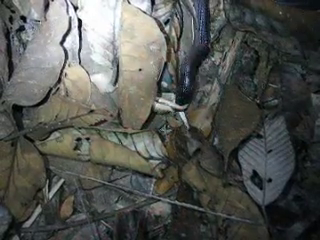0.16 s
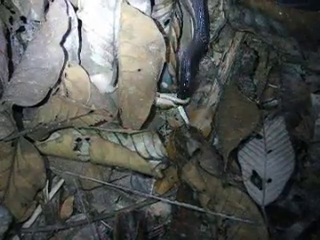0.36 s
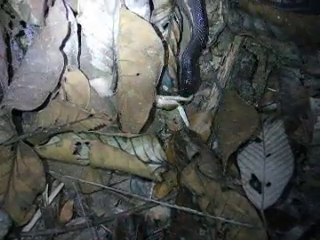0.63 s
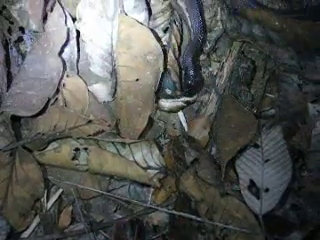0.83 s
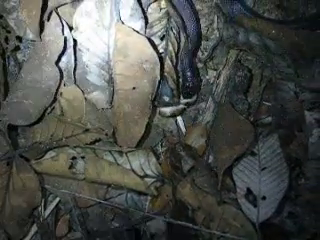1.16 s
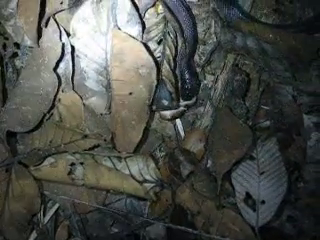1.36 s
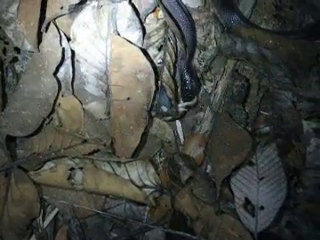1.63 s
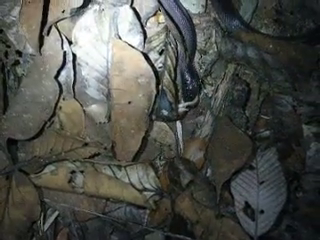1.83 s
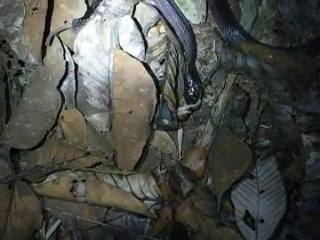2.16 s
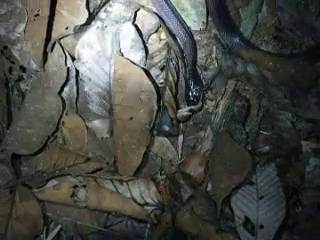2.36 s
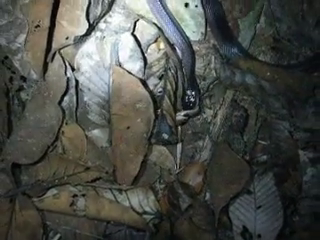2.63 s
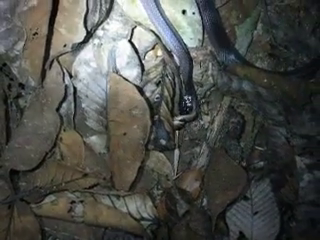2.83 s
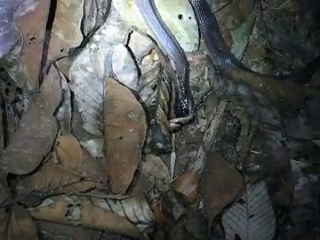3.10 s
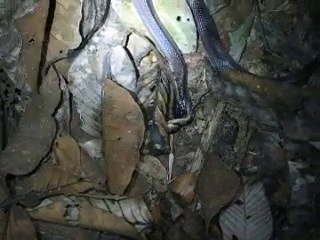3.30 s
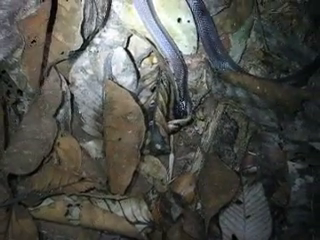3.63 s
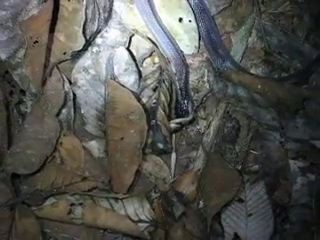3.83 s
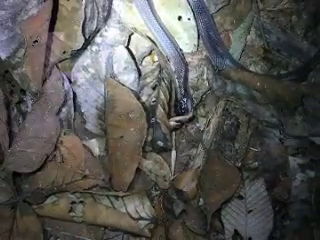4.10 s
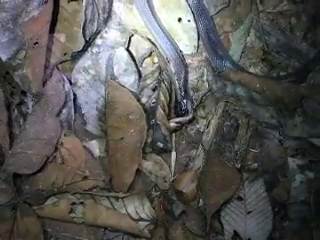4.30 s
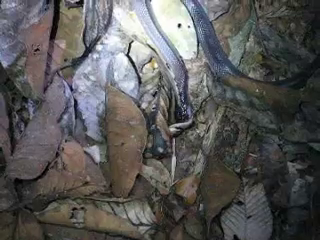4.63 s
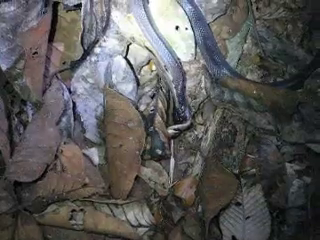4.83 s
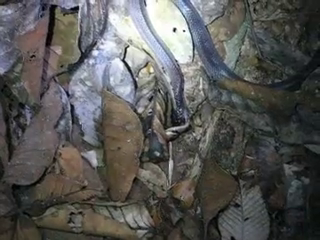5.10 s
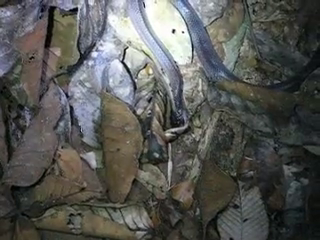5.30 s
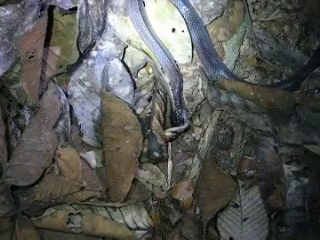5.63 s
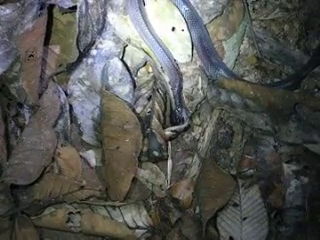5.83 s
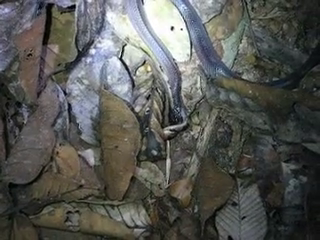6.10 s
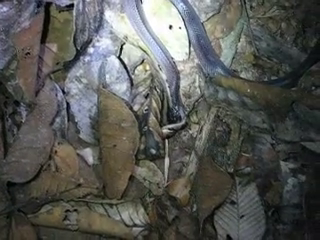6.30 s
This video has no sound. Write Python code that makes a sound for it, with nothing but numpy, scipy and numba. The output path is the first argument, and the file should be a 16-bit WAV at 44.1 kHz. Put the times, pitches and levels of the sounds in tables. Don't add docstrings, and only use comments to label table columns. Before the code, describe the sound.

Rainforest floor at night: a dense, high insect choir pulses rapidly while crickets trill in overlapping bouts at several lower pitches. Very close to the handheld stereo microphone, fingers and strap tick, snap and rustle on plastic for three seconds, then only rare taps remain. Faint hiss, thin electronic whine, motor hum and soft breeze flutter lie underneath; a faint very high katydid buzz enters near the end.

```python
import sys
import numpy as np
from scipy import signal
from scipy.fft import irfft, next_fast_len
from scipy.io import wavfile
from scipy.ndimage import uniform_filter1d
from numba import njit

SR = 44100
rng = np.random.default_rng(int(sys.argv[2]) if len(sys.argv) > 2 else 0)


def gain_from_decibels(decibels):
    exponent = np.asarray(decibels, float) / 20
    return 10 ** exponent


def dump(signal):
    limited = np.clip(np.atleast_2d(signal).T, -1, 1)
    pcm = np.round(limited * 32767).astype(np.int16)
    wavfile.write(sys.argv[1], SR, pcm)


N = 284743


@njit
def ring(x, hz, t60):
    y, z = np.empty(len(x)), 0j
    for i in range(len(x)):
        fade = np.exp(-np.log(1000) / (t60[i] * SR))
        z = z * fade * np.exp(2j * np.pi * hz[i] / SR) + x[i]
        y[i] = z.imag
    return y


def walk(rate):
    k = int(SR / rate)
    steps = np.repeat(rng.standard_normal(N // k + 1), k)
    return 1.3 * uniform_filter1d(uniform_filter1d(steps, k), k)[:N]


def curve(table):
    s, *columns = np.transpose(table)
    return [np.interp(np.arange(N) / SR, s, c) for c in columns]


def bumps(rest_db, s, length, db):
    since = np.arange(N) / SR - np.array(s)[:, None]
    away = np.where(since < 0, -since / 0.95, since)
    away = away / np.array(length)[:, None]
    return np.maximum(rest_db, np.max(np.array(db)[:, None] - 13.5 * away, axis=0))


def ears(db, pan_db):
    return gain_from_decibels(np.array([db + pan_db / 2, db - pan_db / 2]))


def shape(points):
    points_hz, points_db = np.transpose(points)
    return lambda hz: gain_from_decibels(np.interp(np.log(hz), np.log(points_hz), points_db))


def hump(centre_hz, width_hz):
    return lambda hz: np.exp(-.5 * ((hz - centre_hz) / width_hz) ** 2)


def noise(gain):
    # pitch_hz, correlation (0 to 1)
    likeness = [(60, 0.2), (300, 0.63), (1400, 0.58), (3000, 0.14), (15000, 0.037)]
    size = next_fast_len(N, True)
    hz = np.maximum(np.fft.rfftfreq(size, 1 / SR), 1)
    like_hz, like = np.transpose(likeness)
    alike = np.clip(np.interp(np.log(hz), np.log(like_hz), like), 0, 1)
    real, imaginary = rng.standard_normal((2, 2, len(hz)))
    mid, side = (real + 1j * imaginary) * np.sqrt([1 + alike, 1 - alike]) * gain(hz)
    x = irfft(np.array([mid + side, mid - side]), size)[:, :N]
    return x / np.sqrt(np.mean(x ** 2))


def hiss():
    # pitch_hz, level_db (per Hz)
    air = [(15, -62), (30, -18), (430, -7), (900, -8), (1270, -11.5), (2510, -12), (3000, -7.5),
           (5500, -51)]
    # pitch_hz, level_db (per Hz)
    amplifier = [(5000, -9), (6900, -11), (7500, 1.5), (8800, -1), (11500, -3.5), (14500, -6), (16000, -10)]
    return noise(shape(air)) * gain_from_decibels(-62.5) + noise(shape(amplifier)) * gain_from_decibels(-67.5)


def breeze():
    # peak_s, length_s, level_db
    puffs = [
        (0, .05, -67),
        (1.15, 0.99, -66),
        (2.64, 0.55, -67),
        (3.76, 0.63, -64.5),
        (4.7, 0.83, -68),
        (6.46, .3, -65.5),
    ]
    calm_db = -72
    return noise(hump(280, 134)) * gain_from_decibels(bumps(calm_db, *np.transpose(puffs)) - 3.0)


def camera():
    # pitch_hz, width_hz, level_db
    housing = [(453, 9.7, -77.5), (705.5, 17.4, -76.5), (967, 42, -69.5), (1590, 61, -74),
               (1934, 41, -83.5)]
    whine_hz, frames_per_s, width_hz = 8264.5, 30., 1000.0
    since_frame = np.arange(N) / SR % (1 / frames_per_s)
    whine = np.sqrt(2) * np.sin(2 * np.pi * whine_hz * since_frame)
    heard = []
    for hz, db in ((8350.0, -72.5), (8150.0, -57)):
        heard.append(signal.lfilter(*signal.iirpeak(hz, hz / width_hz, fs=SR), whine) * gain_from_decibels(db))
    motor = sum(noise(hump(hz, width)) * ears(db + walk(3.19), 1.2) for hz, width, db in housing)
    return np.array(heard) + motor


def far_insects():
    # pitch_hz, width_hz, level_db, pan_db (left minus right)
    far = [(3480, 310, -68.5, -7), (4084, 180, -59, 3), (4327, 44, -60.5, -6), (4856, 117, -60, 3),
           (5470, 210, -59, 9), (5796, 90, -56.5, -11), (5977, 100, -50.5, -0.5), (6035, 56, -59, 10.5),
           (6190, 100, -69, 5), (6368, 97, -61, 1.5), (6680, 140, -67, 3), (7200, 870, -88.5, 2)]
    # pitch_hz, width_hz, level_db (over the swell)
    joining = [
        (4546, 38, -2),
        (4663, 93, -6),
    ]
    steady = 0
    for hz, width, db, pan_db in far:
        level_db = db + 2.03 * walk(1.09) + 1.33 * walk(12)
        steady = steady + noise(hump(hz, width)) * ears(level_db, pan_db)
    crowd = sum(noise(hump(hz, width)) * gain_from_decibels(db + 0.76 * walk(23)) for hz, width, db in joining)
    swell_peak_s, swell_period_s = 1.93, 2.33
    swell = np.cos(2 * np.pi * (np.arange(N) / SR - swell_peak_s) / swell_period_s)
    return steady + crowd * gain_from_decibels(-55.5 + 2.5 * swell)


def chirper(hz, start_s, period_s, duty=0.73, wander_hz=8., flutter_db=2.5):
    phase = (np.arange(N) / SR - start_s) / period_s % 1
    gate = np.sin(np.pi * np.clip(phase / duty, 0, 1)) ** 0.55
    port_turns = np.array([0 * phase, 0.26 + 0.037 * walk(1.87)])
    turns = np.cumsum(hz + wander_hz * walk(20)) / SR + port_turns
    return 2 * np.sin(2 * np.pi * turns) * gate * gain_from_decibels(flutter_db * np.array([walk(70), walk(70)]))


def choir():
    # time_s, level_db
    leader = [(0.0, -60), (0.4, -53), (0.97, -46.5), (1.3, -53.5), (2.34, -44.5), (2.77, -43.5), (3.4, -48),
              (4.01, -52.5), (4.33, -62), (4.69, -50), (6.46, -52)]
    # time_s, level_db
    whole = [
        (0.0, -48),
        (0.36, -46.5),
        (1.46, -47.5),
        (2.32, -46.5),
        (3.18, -57),
        (4.37, -53),
        (4.71, -50),
        (6.3, -48.5),
    ]
    period_s = .06698
    near = chirper(5882, 2.193, period_s) * ears(curve(leader)[0], 6.5 + 5.1 * walk(2.6)) * gain_from_decibels(-2.0)
    count, crowd = 12, 0
    for hz, (start, pace, side) in zip(np.linspace(5830.0, 6120.0, count), rng.standard_normal((count, 3))):
        voice = chirper(hz, start, period_s * (1 + 0.031 * pace)) * hump(5950.0, 140.0)(hz)
        crowd = crowd + voice * ears(2.75 * walk(1.445), 2.4 * side + 0.91 * walk(1.23))
    return near + crowd * ears(curve(whole)[0], 5.5) * gain_from_decibels(-12.0)


def add_trills(out, wing, starts, length, left_db, right_db, tiring_db):
    hz, strokes, left_hz, right_hz, width_hz = wing
    t, fade_s = np.arange(N) / SR, .1
    rise_s = np.clip(0.31 * length, fade_s, .25)
    drift = 2 * np.pi * np.cumsum(2.5 * walk(4)) / SR
    phases = rng.random((5, 1))
    apart = np.array([0, .25])[:, None, None]
    lines = hz + strokes * np.arange(-2, 3)
    left = hump(left_hz, width_hz)(lines) * gain_from_decibels(left_db)
    right = hump(right_hz, width_hz)(lines) * gain_from_decibels(right_db)
    weights = np.array([left, right])
    for k, start in enumerate(starts):
        on = slice(max(int(start * SR), 0), min(int((start + length) * SR), N))
        edges = np.minimum((t[on] - start) / rise_s, (start + length - t[on]) / fade_s)
        swell = np.sin(np.pi / 2 * np.clip(edges, 0, 1)) ** 2
        angle = 2 * np.pi * (lines[:, None] * t[on] + phases + apart) + drift[on]
        tones = np.sqrt(2) * np.sin(angle)
        out[:, on] += np.einsum("ek,ekt->et", weights, tones) * swell * gain_from_decibels(-tiring_db * k)


def crickets():
    # pitch_hz, strokes_per_s, left_resonance_hz, right_resonance_hz, width_hz
    wings = [(4569.5, 120, 4580, 4490, 110), (4646, 119.5, 4660, 4600, 120), (4657, 119.5, 4650, 4620, 100),
             (3424, 118.5, 3480, 3410, 130), (4040, 102, 3990, 4090, 110), (4373, 119, 4410, 4400, 90),
             (3336, 118, 3336, 3336, 50), (5100, 118, 5100, 5100, 50), (6720, 28, 6720, 6720, 25),
             (6555, 28, 6555, 6555, 25), (12600, 45, 12600, 12600, 90), (1930, 28, 1930, 1930, 20)]
    # first_start_s, length_s, repeat_every_s
    bouts = [(1.18, .82, 1.95), (1.45, .66, 2.02), (.43, .62, 4.3), (-.3, 7, 9), (-.3, 7, 9),
             (1.75, .62, 2.12), (3.2, 1.1, 1.35), (1.2, 1.5, 3.2), (1.55, .21, 1.88), (2.55, .19, 1.93),
             (-.3, 1.25, 9), (3.3, .5, 2.58)]
    # left_db, right_db, tiring_db (lost with each repeat)
    bout_levels = [(-50, -51, 2), (-52, -51.5, 2.9), (-52.5, -53, 4), (-68, -69.5, 0), (-63.5, -65.5, 0),
                   (-59.5, -62, 0.5), (-69, -68, 6), (-72, -66, -4), (-65, -62, 0), (-63, -64, -2),
                   (-76, -86, 0), (-75, -72, 1)]
    # pitch_hz, first_call_s, last_call_before_s, left_db, right_db
    phrases = [
        (4160, 0.9, 1.5, -61, -57.5),
        (4066, 2.1, 2.45, -54, -55.5),
        (4400, 2.28, 2.9, -69, -62),
        (5310, 2.5, 4.5, -65, -64),
        (4210, 5.27, 5.65, -58, -54),
        (4220, 6.9, 7.3, -63, -61),
    ]
    out = np.zeros((2, N))
    for wing, (first, length, every), levels in zip(wings, bouts, bout_levels):
        add_trills(out, wing, np.arange(first, N / SR, every), length, *levels)
    call_s, call_every_s, strokes, width_hz = .25, .257, 28, 35
    for hz, first, last, left_db, right_db in phrases:
        wing = (hz, strokes, hz, hz, width_hz)
        add_trills(out, wing, np.arange(first, last, call_every_s), call_s, left_db, right_db, 0)
    return out * gain_from_decibels(1.1 * np.array([walk(9), walk(11)]))


def rustle():
    # time_s, level_db
    handling = [
        (0, -71),
        (1.9, -70),
        (2.9, -74),
        (3.3, -77),
        (6.46, -77.5),
    ]
    # peak_s, length_s, bright_db, dull_db
    drags = [(0.108, .08, -62, -53.5), (0.288, 0.15, -61.5, -55), (0.644, 0.034, -58.5, -56),
             (0.896, 0.036, -58, -42), (1.38, 0.038, -55.5, -42), (1.753, 0.019, -51.5, -42.5),
             (1.978, .07, -59.5, -51.5), (2.114, .05, -65, -62), (2.276, 0.12, -63.5, -55),
             (2.433, 0.037, -62.5, -60), (2.497, 0.032, -60, -54), (2.707, 0.025, -54.5, -58),
             (2.997, 0.037, -54.5, -54), (3.96, 0.25, -66.5, -59), (6.15, 0.54, -79, -63)]
    hands_db = curve(handling)[0]
    s, length, bright_peaks_db, dull_peaks_db = np.transpose(drags)
    bright_db = bumps(hands_db, s, length, bright_peaks_db)
    dull_rest_db = hands_db[0] + 10 + 4.2 * (hands_db - hands_db[0])
    dull_db = bumps(dull_rest_db, s, length, dull_peaks_db)
    grains_per_s, scatter_db = 900., 3.5
    sizes = gain_from_decibels(scatter_db * np.minimum(rng.exponential(size=N), 3.5))
    slips = (rng.random(N) < grains_per_s / SR) * sizes
    grit = 0.45 + uniform_filter1d(slips, size=40) * 20
    grit = grit / np.sqrt(np.mean(grit ** 2))
    bright_shape = shape([(7000, -44), (9000, -13), (12500, -1.0), (14500, -13.0), (16500, -14.5)])
    dull_shape = shape([(150, -28), (500, -8.5), (1200, -5), (3000, -1.5), (7000, 0), (9000, -28)])
    bright = noise(bright_shape) * ears(bright_db + 0.22, 3.8)
    rasp = noise(hump(7650, 810)) * gain_from_decibels(1.02 * (bright_db + 63.5) - 56)
    dull = noise(dull_shape) * ears(dull_db + 0.5, -3.0)
    return grit * (bright + rasp + dull)


def ticks(hits, knock_db, per_crack, cycles, t60):
    size = 4096
    out, t = np.zeros((2, N + size)), np.arange(float(size)) / SR
    bands_hz = ((850, 5000), (2400, 5450), (5800, 7630), (8500, 12000))
    bands = [signal.butter(2, band_hz, "band", fs=SR, output="sos") for band_hz in bands_hz]
    pans_db = (-3.0, -5.0, -3.0, 1.5)
    push = np.exp(-np.log(1000) * t / t60) + 3.9 * np.exp(-t / 0.00022)
    for s, db, hz, crack_db in hits:
        grit = rng.standard_normal((4, size)) * push
        pitch = np.full(size, 1. * hz)
        grit[0] = ring(grit[0], pitch, cycles / pitch)
        gains_db = (-4.0, knock_db + 12.0 + per_crack * crack_db, crack_db + 7.0, crack_db - 12.0)
        start = int(s * SR)
        for band, g, gain_db, pan_db in zip(bands, grit, gains_db, pans_db):
            part = signal.sosfilt(band, g)
            part = part / np.abs(part).max()
            out[:, start:start + size] += ears(db + gain_db, pan_db)[:, None] * part
    return out[:, :N]


def finger_thuds():
    # start_s, peak_db, ring_hz, crack_db (over peak)
    thuds = [(0.0064, -34, 1210, 5.5), (0.0877, -44.5, 1200, 4), (0.1715, -50.5, 999, -2),
             (0.4668, -43, 980, -5), (0.5272, -50, 940, -5), (0.6406, -42.5, 1270, -10),
             (0.6888, -40, 1310, -15), (0.7372, -47, 961, -9), (0.818, -44.5, 1020, 5),
             (0.8659, -42.5, 1290, -5), (0.9074, -44, 1070, 9), (0.9996, -43.5, 1430, -9),
             (1.0475, -46, 1260, -11), (1.1959, -39, 1400, -1), (1.279, -44, 1030, -1.5),
             (1.6102, -47.5, 1280, 1), (1.8124, -46, 1230, -5), (1.9616, -43, 910, -4),
             (2.1034, -38.5, 1380, 1), (2.1154, -51, 940, 9), (2.4304, -55, 925, 14),
             (2.5486, -46, 1190, -10.5), (1.295, -43, 1000, -8), (1.318, -48, 1400, -2)]
    return ticks(thuds, knock_db=-8.5, per_crack=0.14, cycles=12.5, t60=0.03)


def grip_knocks():
    # start_s, peak_db, ring_hz, crack_db (over peak)
    knocks = [
        (.0877, -46, 600, -8),
        (1.364, -44, 970, -8),
        (2.995, -39.5, 1010, -2),
        (3.494, -48, 969, -6),
    ]
    return ticks(knocks, knock_db=-20, per_crack=0.5, cycles=34., t60=0.04)


def nail_snaps():
    # start_s, peak_db, ring_hz, crack_db (over peak)
    snaps = [(0.13, -33, 1930, -2.5), (0.2298, -27, 2000, -10), (0.2319, -30.5, 2200, -12),
             (0.2349, -33, 2100, -3.5), (0.2596, -42, 2070, -9), (0.2735, -39, 2040, -2.5),
             (0.3188, -42, 2290, -2), (0.4808, -34, 2010, -5.5), (0.5673, -46, 2140, -2),
             (0.7931, -38.5, 2200, 0), (0.8974, -36.5, 2120, 5), (0.9386, -42, 2290, 3.5),
             (0.9474, -48, 1690, 2), (1.0967, -34, 2020, -6), (1.148, -40, 1590, -15),
             (1.237, -39, 1500, -8), (1.362, -35, 2290, -8), (1.3865, -35.5, 2360, 3.5),
             (1.46, -46.5, 2370, -5), (1.7467, -56, 1920, 0), (1.7541, -26, 2360, -2.5),
             (1.7744, -45, 2280, -4), (1.7968, -39.5, 1730, -2), (1.9824, -38.5, 2250, -3),
             (2.4104, -42, 2330, -12), (2.7104, -43, 2350, -7), (3.9172, -42, 1950, -14),
             (5.0722, -45, 1630, -21)]
    return ticks(snaps, knock_db=-5.5, per_crack=.25, cycles=14., t60=0.03)


def katydid():
    # time_s, pitch_hz, level_db
    song = [
        (5.75, 13300, -95),
        (5.82, 13300, -83),
        (6.082, 13600, -71),
        (6.318, 13600, -71),
        (6.4, 13400, -72),
    ]
    teeth_per_s, strokes_per_s = 270.0 * 4, 48.
    hz, db = curve(song)
    t = np.arange(N) / SR
    strikes = (rng.random(N) < teeth_per_s / SR) * rng.standard_normal(N)
    throb = 1 + .45 * np.sin(2 * np.pi * strokes_per_s * t)
    buzz = ring(strikes, hz, np.full(N, .012)) * throb
    fade_in = np.clip((t - song[0][0]) / .1, 0, 1)
    return buzz / buzz.std() * ears(db, 14) * fade_in


def scene():
    background = hiss() + breeze() + camera()
    insects = far_insects() + choir() + crickets() + katydid()
    hands = rustle() + finger_thuds() + grip_knocks() + nail_snaps()
    return background + insects + hands


def band_limit(x):
    return signal.sosfilt(signal.butter(12, 16410, fs=SR, output="sos"), x)


def record(dry):
    return band_limit(dry)


dry = scene()
out = record(dry)
dump(out)
```